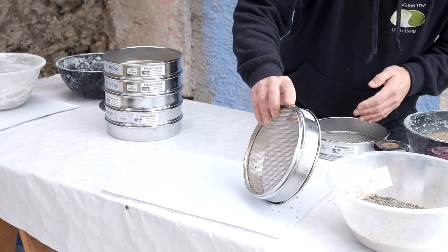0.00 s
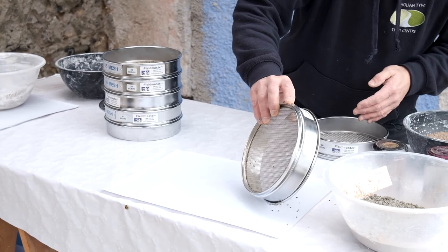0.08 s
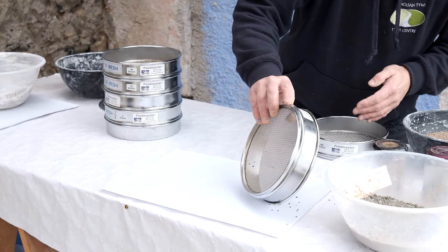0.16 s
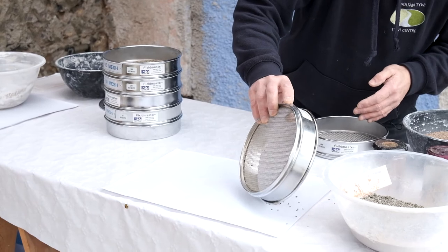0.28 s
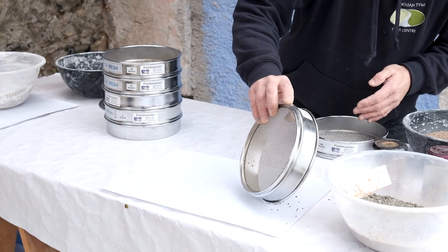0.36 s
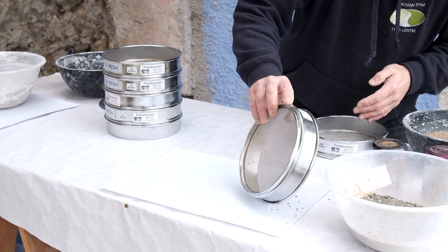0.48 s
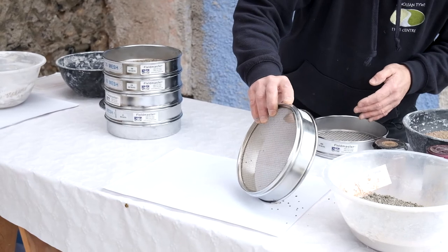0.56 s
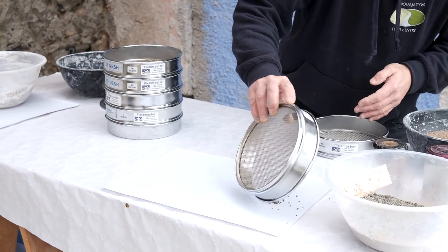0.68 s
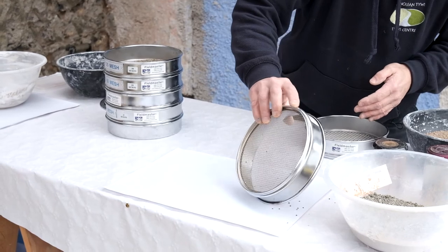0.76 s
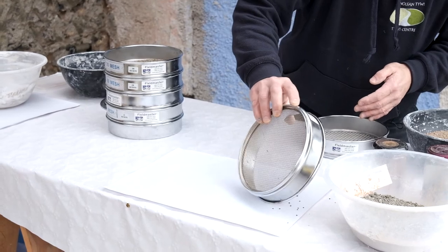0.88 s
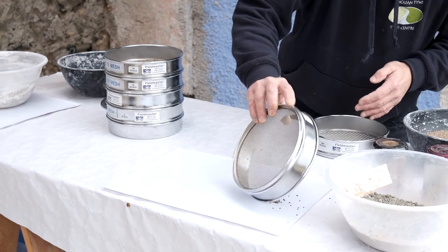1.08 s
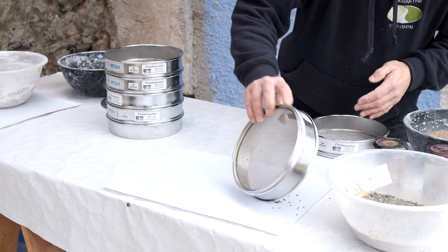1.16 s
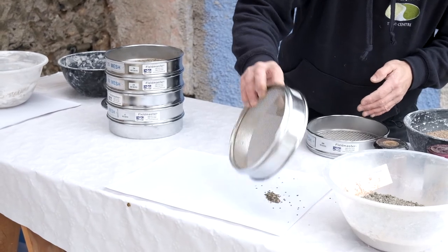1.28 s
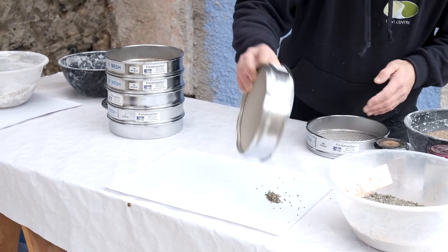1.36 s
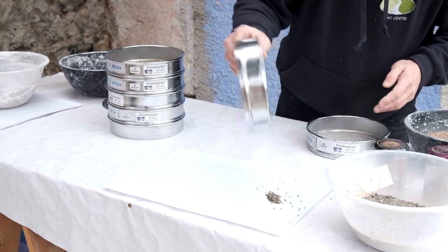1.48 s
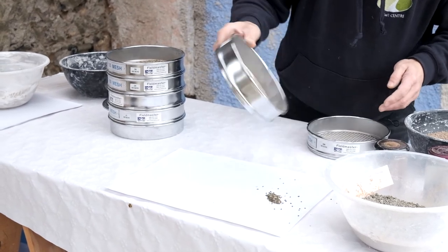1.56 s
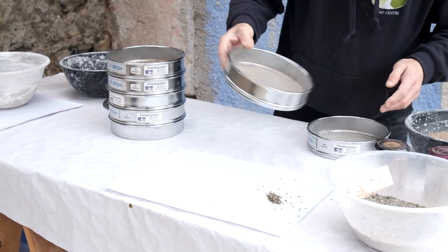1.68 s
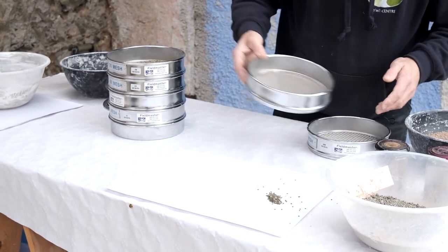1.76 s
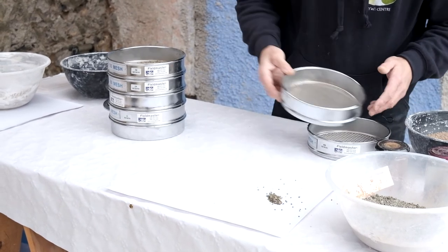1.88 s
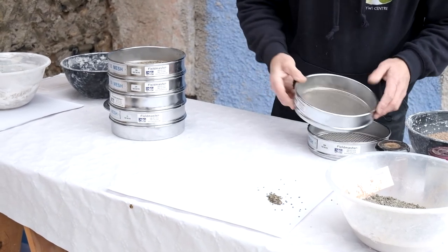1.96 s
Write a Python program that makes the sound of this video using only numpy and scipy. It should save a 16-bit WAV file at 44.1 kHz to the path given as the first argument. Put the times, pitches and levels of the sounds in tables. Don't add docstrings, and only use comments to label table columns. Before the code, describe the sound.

A metal sieve rim knocks repeatedly on a cloth-covered table, shaking loose ticking stones and hissing sand

```python
import sys
import numpy as np
from scipy import signal
from scipy.fft import rfft, irfft
from scipy.io import wavfile
from scipy.ndimage import uniform_filter1d

SR = 44100
rng = np.random.default_rng(int(sys.argv[2]) if len(sys.argv) > 2 else 0)


def inscribe(sig):
    pcm = np.round(np.clip(np.atleast_2d(sig).T, -1, 1) * 32767)
    wavfile.write(sys.argv[1], SR, pcm.astype(np.int16))


def magnitude_from_level(level_db):
    exponent = np.asarray(level_db, float) / 20
    return 10 ** exponent


N = 88200

# (time [s], force [dB], hardness [dB per octave], rim ring [dB], shaken sand [dB])
KNOCKS = [
    (0.0112, -18, -6, -8.5, -38.5),
    (0.203, -10.5, -5, -27, -43.5),
    (0.3816, -7.5, -1.5, -36, -40.5),
    (0.5168, -7, -6, -53, -42),
    (0.657, -6, -1.5, -46.5, -40),
    (0.796, .5, 5.5, -25.5, -29),
    (.965, -0.5, 2.5, -37, -29.5),
    (1.0823, -8.5, -3.5, -44, -46),
    (1.177, -4.5, 4, -34, -36.5),
]
# (time [s], level [dB])
TRICKLE = [(0, -48.5), (.12, -60.5), (.3, -63.5), (.8, -60.5), (1.25, -58), (1.4, -71), (1.6, -72),
           (1.8, -71), (1.96, -69.5), (2, -63)]
# (frequency [Hz], level [dB])
SAND = [(1500, -1.5), (2600, -9), (3900, -8), (4500, -3), (7900, -10.5), (11800, -12), (14000, -20),
        (16000, -32)]
# (frequency [Hz], level [dB])
GRIT = [(2000, -64), (4000, -5), (6000, 1.5), (10500, 3.5), (13500, -5.5), (16000, -17)]


def read(points, hz):
    f, value = np.transpose(points)
    return np.interp(np.log(hz + 1), np.log(f + 1), value)


def evened(x):
    return x / np.sqrt(np.mean(x ** 2) + 1e-20)


def add(mix, s, sound):
    part = mix[max(round(s * SR), 0):][:len(sound)]
    part += sound[:len(part)]


def coloured(x, table):
    gain = magnitude_from_level(read(table, np.fft.rfftfreq(len(x), 1 / SR)))
    return evened(irfft(rfft(x) * gain, len(x)))


def high(x, hz):
    return signal.sosfilt(signal.butter(2, hz, "high", fs=SR, output="sos"), x)


def hum():
    # (frequency [Hz], level [dB])
    hum_spectrum = [(15, -34), (25, 2), (296, -9), (538, -12), (634, -9), (979, -6.5), (3230, -42),
                    (5570, -44), (16500, -86.5)]
    # (time [s], level [dB])
    hum_swell = [(0, 5), (0.699, 8.5), (1.401, 1.5), (2, -5)]
    swell_db = np.interp(np.arange(N) / SR, *np.transpose(hum_swell))
    flutter = evened(uniform_filter1d(rng.standard_normal(N), size=3000))
    return magnitude_from_level(-55 + 0.8 * flutter + swell_db) * coloured(rng.standard_normal(N), hum_spectrum)


def sand():
    # (time [s], level [dB], t60 [s])
    spill_table = [(.075, -46, .04), (0.079, -35, 0.055), (0.116, -43.5, 0.14), (.159, -54, 0.095),
                   (0.368, -36, 0.036), (.376, -39.5, 0.175), (.558, -34, 0.083), (0.65, -43.5, 0.038),
                   (1.859, -65, .06), (1.979, -57.5, 0.12), (1.524, -63.5, 0.25)]
    rise_s, puff_t60 = 0.0012, 0.18
    t = np.arange(N) / SR
    level = magnitude_from_level(np.interp(t, *np.transpose(TRICKLE)))
    for s, *_, sand_db in KNOCKS:
        u = np.maximum(t - s, 0)
        level = level + (1 - np.exp(-u / rise_s)) * magnitude_from_level(sand_db - 60 * u / puff_t60)
    spills = np.zeros(N)
    for s, db, t60 in spill_table:
        spills += (t > s) * magnitude_from_level(db - 60 * np.maximum(t - s, 0) / t60)
    unevenness = magnitude_from_level(1.6 * evened(uniform_filter1d(rng.standard_normal(N), size=60)))
    fine, coarse = unevenness * rng.standard_normal((2, N))
    return level * coloured(fine, SAND) + spills * coloured(coarse, GRIT)


def crackle():
    grains_per_s, level_db, spread_db = 1700, 1.5, 5.5
    t = np.arange(100) / SR
    out = np.zeros(N)
    for hz in np.geomspace(4300, 10500, num=8):
        size = magnitude_from_level(spread_db * np.minimum(rng.exponential(1, N), 3))
        hits = size * (rng.random(N) < grains_per_s / 8 / SR)
        tick = np.sin(2 * np.pi * hz * t) * t * hz * np.exp(-t * hz)
        out += signal.oaconvolve(hits, tick)[:N]
    return magnitude_from_level(level_db + np.interp(np.arange(N) / SR, *np.transpose(TRICKLE))) * out


def stone(peak_db, hz, scatter_t60):
    t = np.arange(4096) / SR
    u = t * hz / 2.3
    overtone_hz = min(1.65 * hz, 14000)
    ring = np.sin(2 * np.pi * hz * t) + magnitude_from_level(-10) * np.sin(2 * np.pi * overtone_hz * t)
    tick = u ** 0.8 * np.exp(-u * (1 + 0.3 * u)) * ring
    snap = magnitude_from_level(-6.5) * np.exp(-t / 0.0005) * coloured(rng.standard_normal(4096), GRIT) / 2
    tick = tick / abs(tick).max() + snap
    bounce_s = 0.0013 * rng.uniform(0.53, 1.4)
    add(tick, bounce_s, magnitude_from_level(-4.5 - 5 * rng.random()) * tick)
    scatter = magnitude_from_level(-18 - 60 * t / max(scatter_t60, 0.004)) * coloured(rng.standard_normal(4096), SAND)
    return magnitude_from_level(peak_db) * (tick + scatter)


def knock(force_db, hard_db, rim_db):
    # (frequency [Hz], length [s], level [dB], signed weight [-1 to 1])
    thud_modes = [(277.5, 0.0042, 5.5, -0.98), (551.6, 0.0053, -4, 0.96), (883.3, 0.0033, -13, -0.91),
                  (1240, 0.0027, -34.5, 1), (1697, 0.003, -30, -1), (2253, .003, -44.5, 0.79),
                  (2880, 0.0026, -48, -1)]
    # (frequency [Hz], level [dB], t60 [s])
    frame_modes = [(88.4, -22, 0.26), (158.6, -15, 0.25), (188.3, -26, .17), (227.3, -19.5, 0.15),
                   (263.4, -33, 0.36), (302, -24, 0.073), (360.7, -20, 0.23), (419.4, -21.5, 0.2),
                   (547.6, -26, .24), (618.4, -24.5, 0.14), (703.3, -22.5, 0.08), (851.3, -37.5, 0.16),
                   (1083, -37.5, 0.11), (1291, -44, .2)]
    # (frequency [Hz], level [dB], t60 [s])
    rim_modes = [(4424, 5.5, 0.024), (4870, 5, 0.026)]
    longest_t60 = 0.33
    t = np.arange(SR // 2) / SR

    def tilt(hz):
        return magnitude_from_level(hard_db * np.log2(max(hz / 275, 1)))

    thud = np.zeros(len(t))
    for hz, last, db, side in thud_modes:
        envelope = (t / last) ** 0.72 * np.exp(-(t / last) ** 2 / 2)
        thud += side * magnitude_from_level(db) * tilt(hz) * envelope * np.sin(2 * np.pi * hz * t)

    modes = []
    for hz, db, t60 in frame_modes:
        level_jitter, pitch_jitter = rng.standard_normal(2)
        decay = magnitude_from_level(db + 2 * level_jitter - 60 * t / min(t60, longest_t60))
        modes.append(-decay * tilt(hz) * np.sin(2 * np.pi * hz * (1 + pitch_jitter / 80) * t))
    modes = np.array(modes)

    loose = modes[np.transpose(frame_modes)[0] > 400].sum(0)
    chatter = rng.standard_normal(4000) ** 3 * magnitude_from_level(-60 * t[:4000] / 0.4)
    rattle = signal.fftconvolve(loose, chatter / np.linalg.norm(chatter))[:len(t)]
    frame = modes.sum(0) + magnitude_from_level(-1.5) * rattle

    rim = np.zeros(len(t))
    for hz, db, t60 in rim_modes:
        rim += magnitude_from_level(rim_db + db - 60 * t / t60) * np.sin(2 * np.pi * hz * t)
    blow = thud + rim * (1 - np.exp(-t / 0.0027))
    after = frame * (1 - np.exp(-t / 0.0025))
    return magnitude_from_level(force_db) * blow, magnitude_from_level(force_db) * after


def yard(x):
    # (frequency [Hz], t60 [s])
    yard_decay = [(80, 0.19), (210, 0.39), (560, 0.22), (900, .3), (1470, 0.2), (3880, 0.13), (10200, 0.13)]
    onset_s = 0.0074
    taps = np.zeros(SR // 2)
    at = np.arange(0, len(taps) - 22, 22)
    taps[at + rng.integers(0, 22, len(at))] = rng.choice([-1., 1.], len(at))
    hz, t, z = signal.stft(taps, SR, nperseg=512)
    decay = magnitude_from_level(-60 * t / read(yard_decay, hz)[:, None])
    tail = signal.istft(z * decay, SR, nperseg=512)[1]
    tail = tail * np.clip(np.arange(len(tail)) / SR / onset_s, 0, 1) ** 2
    return signal.fftconvolve(x, tail / np.linalg.norm(tail))[:N]


def rubs():
    # (time [s], length [s], frequency [Hz], bandwidth [Hz], level [dB])
    rub_table = [
        (1.30, .09, 170, 60, -52),
        (1.29, .045, 500, 200, -53),
        (1.365, .05, 560, 120, -55),
        (.925, .04, 3600, 300, -63),
        (1.525, .04, 4000, 2500, -66),
        (1.855, .012, 2500, 900, -63),
        (1.856, .01, 6000, 1200, -60),
        (1.972, .05, 2220, 90, -61),
        (1.972, .04, 3300, 200, -67),
    ]
    out = np.zeros(N)
    f = np.fft.rfftfreq(4096, 1 / SR)
    for s, length, hz, width, db in rub_table:
        resonance = 1 / (1 + ((f - hz) / (width / 2)) ** 2)
        band = evened(irfft(rfft(rng.standard_normal(4096)) * resonance))
        n = min(round(length * SR), 4096)
        add(out, s, magnitude_from_level(db) * np.hanning(n) * band[:n])
    return out


def birds():
    # (start [s], length [s], from [Hz], to [Hz], level [dB])
    calls = [(1.325, .045, 8400, 7900, -68), (1.37, .03, 7900, 7900, -73), (1.40, .036, 7950, 7300, -65),
             (1.42, .11, 8550, 8300, -74), (1.70, .10, 8300, 8250, -74), (1.63, .04, 5550, 5550, -73),
             (1.675, .03, 5600, 5800, -70), (1.565, .02, 5600, 5800, -73), (1.75, .035, 5450, 5400, -71),
             (1.79, .03, 5300, 5800, -71), (1.755, .03, 6200, 6150, -74), (1.47, .03, 6300, 6250, -74)]
    out = np.zeros(N)
    for s, length, from_hz, to_hz, db in calls:
        u = np.arange(round(length * SR)) / (length * SR)
        waver = evened(uniform_filter1d(rng.standard_normal(8000), size=200))[:len(u)]
        flutter = evened(uniform_filter1d(rng.standard_normal(8000), size=200))[:len(u)]
        hz = (from_hz + (to_hz - from_hz) * u) * (1 + 0.009 * waver)
        whistle = np.sin(2 * np.pi * np.cumsum(hz) / SR)
        add(out, s, magnitude_from_level(db + 4 * flutter) * np.sqrt(np.sin(np.pi * u)) * whistle)
    return out


def scene():
    # (time [s], peak [dB], pitch [Hz], scatter t60 [s])
    falling_stones = [(0.025, -33, 5200, 0.02), (0.0424, -34, 9430, 0.018), (0.057, -16, 6400, 0.01),
                      (0.0578, -22, 4940, 0.0055), (0.0704, -29, 6600, 0.013), (0.075, -32, 9500, 0.014),
                      (0.0819, -25.5, 9800, 0.0048), (0.0886, -22.5, 5300, 0.0046),
                      (0.109, -31.5, 5130, 0.016), (0.1175, -35, 6100, 0.017), (0.128, -35, 4530, 0.015),
                      (0.1333, -32, 10640, 0.017), (0.1441, -28, 6560, 0.0047), (0.16, -26, 6000, 0.0081),
                      (0.18, -33, 6660, 0.013), (0.1839, -32, 6400, 0.15), (0.214, -16.5, 6200, 0.023),
                      (0.278, -39.5, 6940, 0.02), (0.29, -37.5, 7020, 0.027), (0.408, -31, 6490, 0.017),
                      (0.3183, -33.5, 4700, 0.073), (0.3654, -28.5, 10770, 0.0078),
                      (0.5588, -21, 10500, 0.0053), (0.65, -40, 10870, 0.02), (0.7002, -19.5, 6480, 0.035),
                      (0.7448, -37, 6630, 0.019), (0.7685, -36, 7200, 0.025),
                      (0.9479, -31.5, 5900, 0.016), (1.0145, -20, 6700, 0.042), (1.0594, -33, 10700, 0.06),
                   (1.084, -29, 6700, 0.017), (1.1234, -39, 6880, 0.017), (1.223, -24, 6340, 0.027),
                   (1.267, -30, 9850, 0.017), (1.293, -38, 6360, 0.024), (1.3104, -45, 6760, 0.014),
                   (1.3508, -56, 6990, 0.02), (1.364, -65, 6400, 0.02), (1.3803, -55, 6360, 0.02),
                   (1.4531, -47, 4560, 0.021), (1.5239, -35, 6930, 0.027), (1.592, -46.5, 10700, 0.018),
                   (1.6745, -64, 5560, 0.015), (1.8582, -39, 10290, 0.035), (1.8686, -38, 12850, 0.05),
                   (1.945, -47, 8530, 0.022), (1.956, -50.5, 6450, 0.014), (1.98, -41.5, 9430, 0.026),
                      (0.01, -27, 9900, .015), (0.013, -25, 8600, .015), (.172, -39, 4900, .015),
                    (.195, -35, 6900, .015), (0.201, -31, 7550, .015), (.299, -49, 5900, .015),
                    (.3765, -32, 9300, .02), (.428, -35.5, 6080, .015), (.447, -47.5, 7900, .015),
                    (.47, -50, 5000, .015), (0.515, -37.5, 9200, .015), (0.622, -51, 8000, .015),
                    (0.843, -32, 9100, .02), (0.902, -45.5, 10100, .015), (1.054, -44, 5500, .015),
                    (1.063, -38, 6000, .015), (1.173, -45, 10500, .015), (1.216, -42, 10500, .015),
                    (1.839, -59.5, 10000, .015)]
    # (delay [s], level [dB])
    echoes = [(0.022, -21.5), (0.0235, -21.5), (0.035, -21), (0.041, -19), (0.052, -30.5), (.066, -24.5),
              (.072, -35.5)]
    blows, ring, stones = np.zeros((3, N))
    for s, force_db, hard_db, rim_db, _ in KNOCKS:
        blow, after = knock(force_db, hard_db, rim_db)
        add(blows, s, blow)
        add(ring, s, after)
    for s, *row in falling_stones:
        add(stones, s - 0.0002, stone(*row))
    table = blows + ring
    for delay, db in echoes:
        add(table, delay, magnitude_from_level(db) * blows)
    table = high(table, 72.9)
    wet = yard(magnitude_from_level(-11) * high(blows, 380) + magnitude_from_level(-13) * stones)
    background = hum() + magnitude_from_level(0.5) * birds()
    return (table + stones + wet + sand() + crackle() + rubs() + background)[None]


def top_cut(x):
    return signal.sosfilt(signal.butter(12, 16960, fs=SR, output="sos"), x)


def record(dry):
    hot = np.clip(dry * magnitude_from_level(-2), -1.03, 1.03)
    low_pass = signal.firwin(511, 15850, window=("kaiser", 9), fs=SR)[None]
    dull = np.clip(signal.oaconvolve(hot, low_pass, "same"), -1, 1)
    return top_cut(dull)


dry = scene()
out = record(dry)
inscribe(out)
```